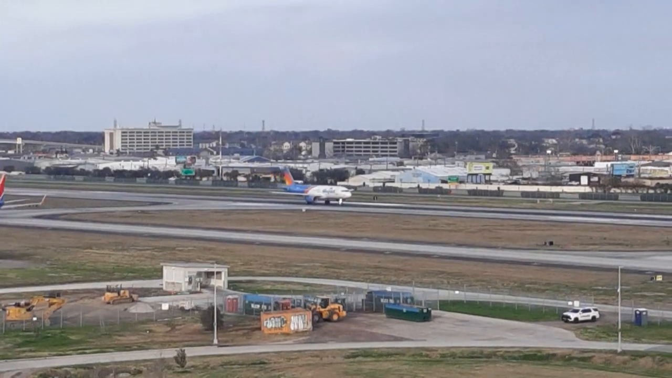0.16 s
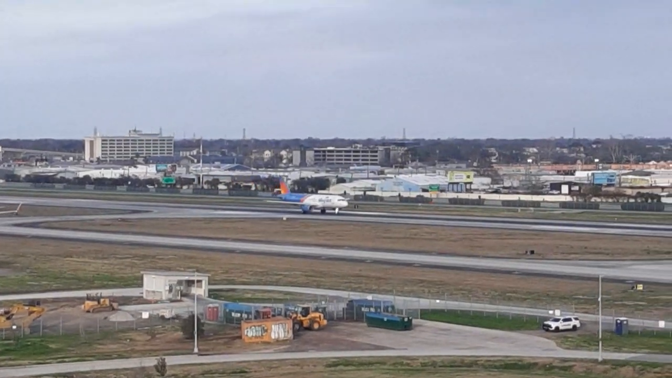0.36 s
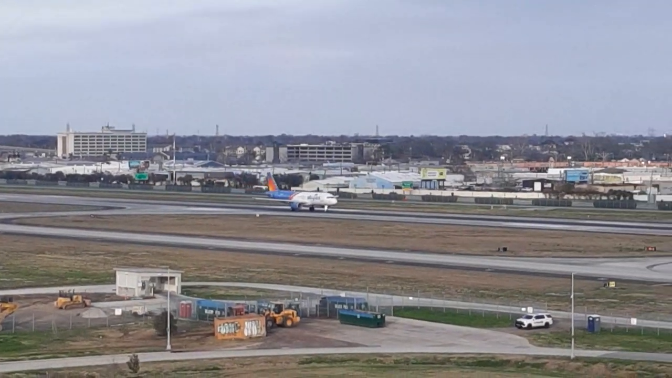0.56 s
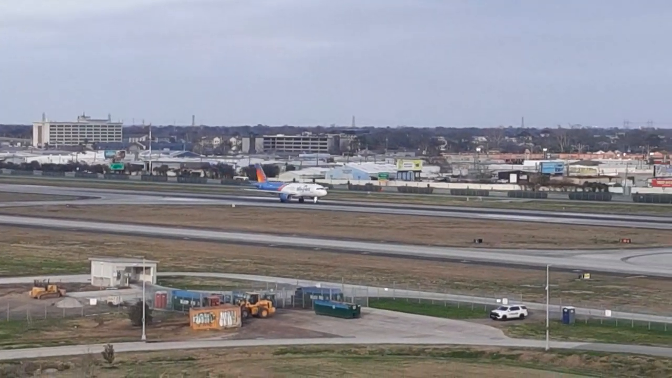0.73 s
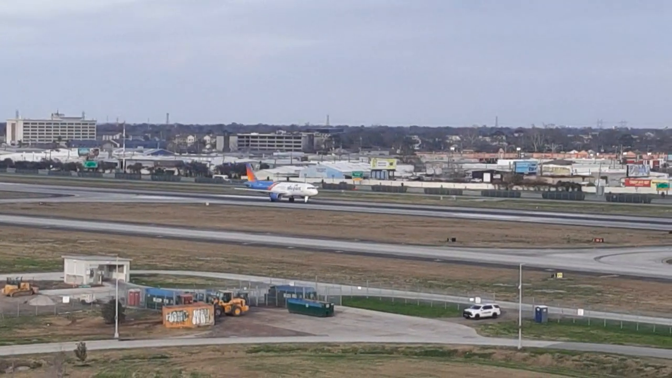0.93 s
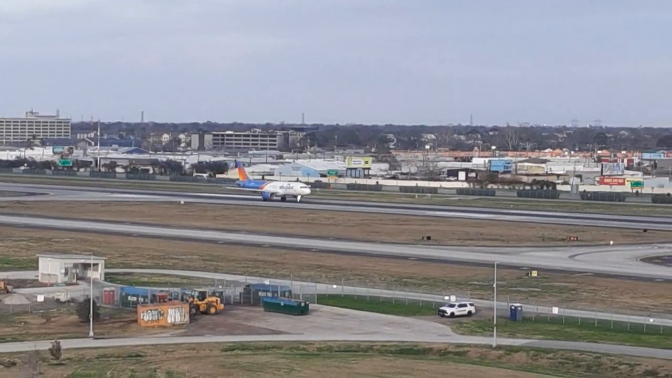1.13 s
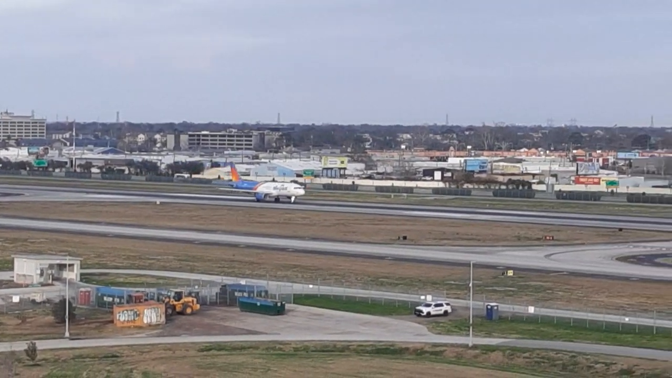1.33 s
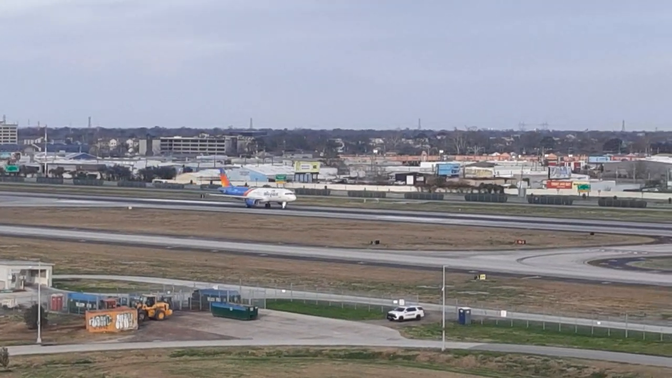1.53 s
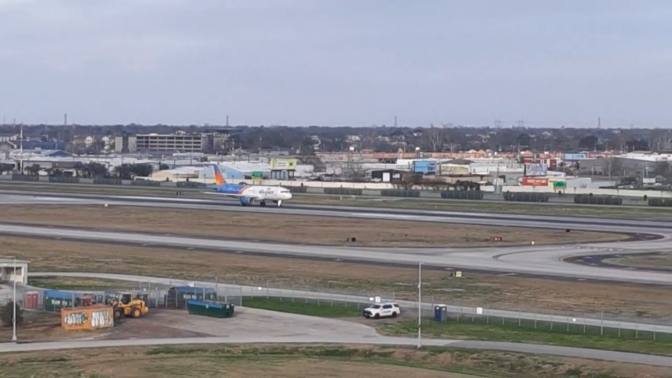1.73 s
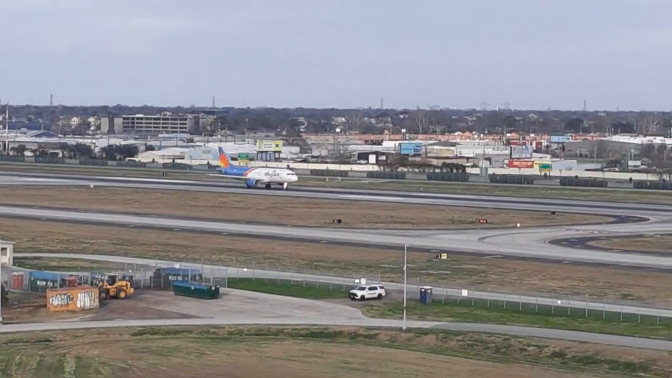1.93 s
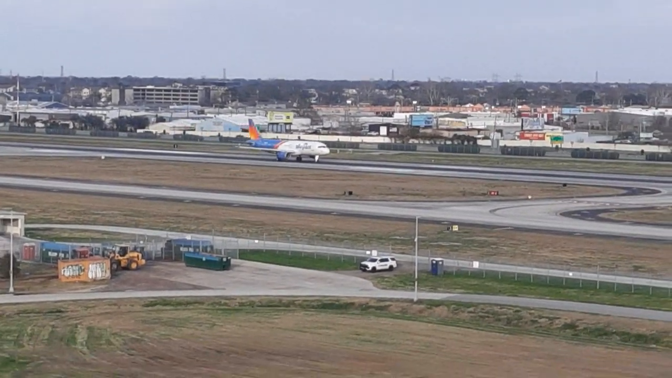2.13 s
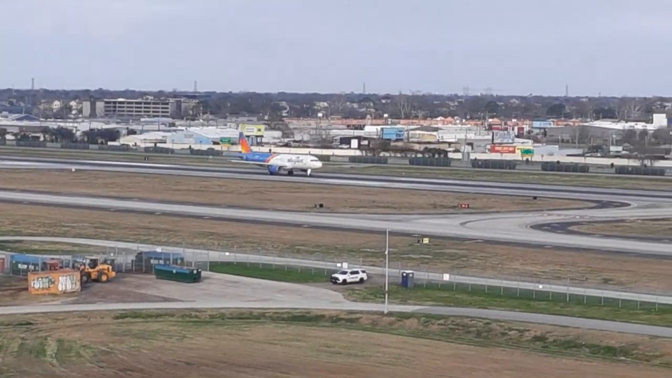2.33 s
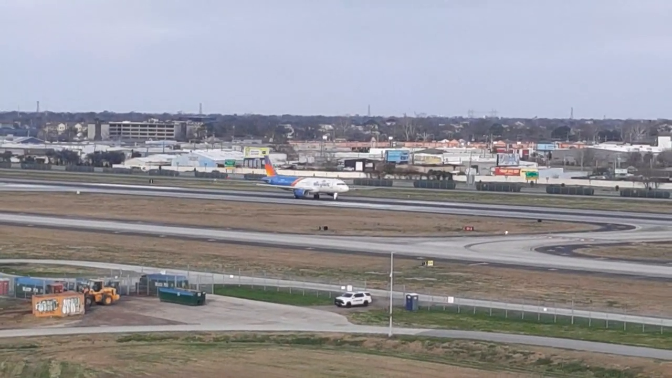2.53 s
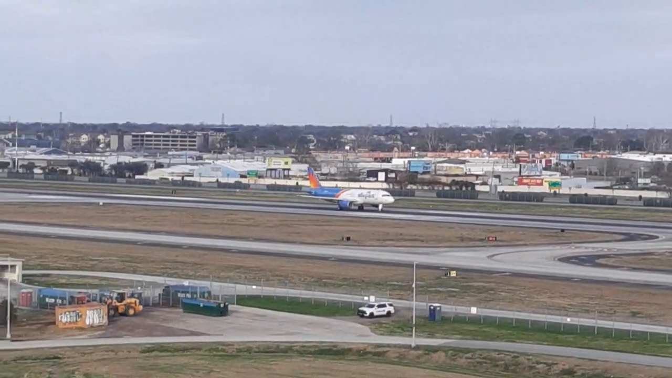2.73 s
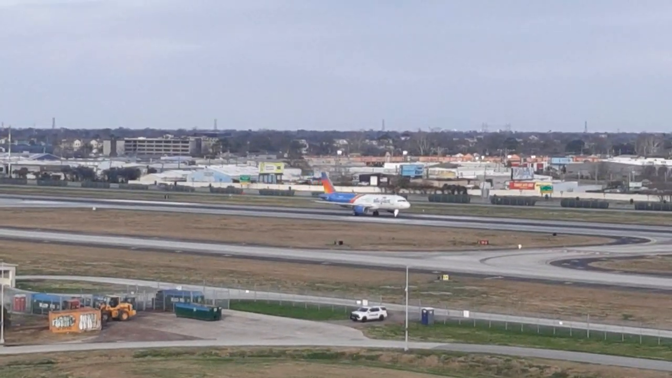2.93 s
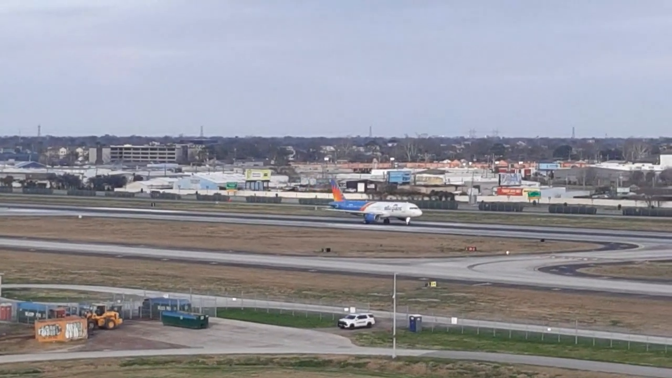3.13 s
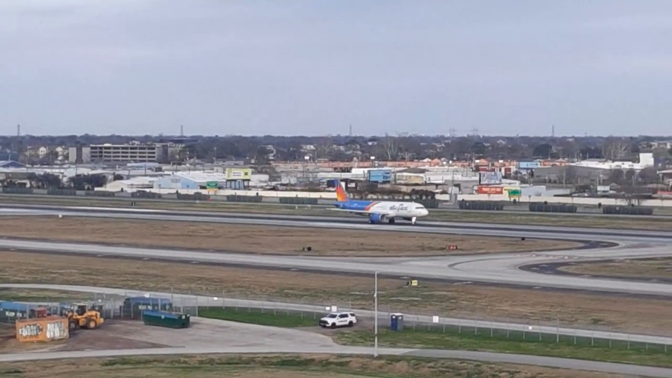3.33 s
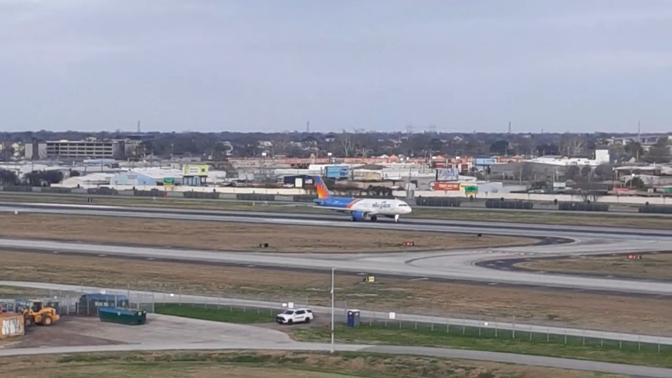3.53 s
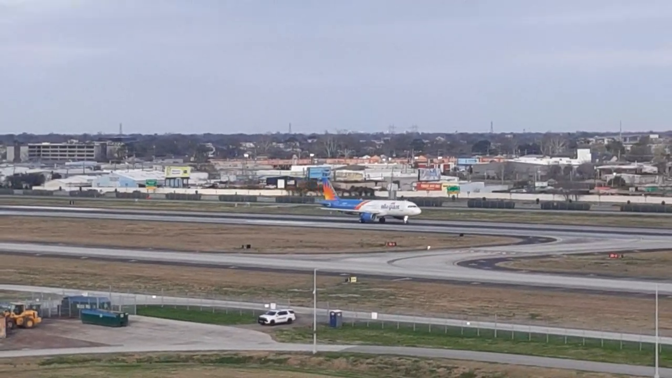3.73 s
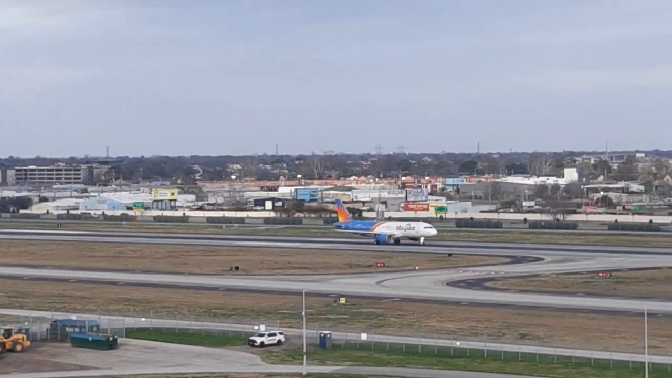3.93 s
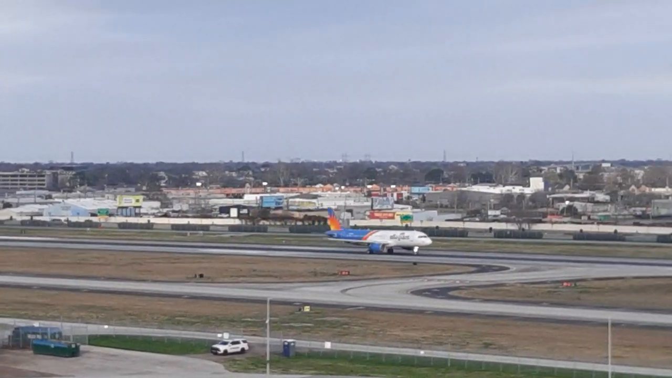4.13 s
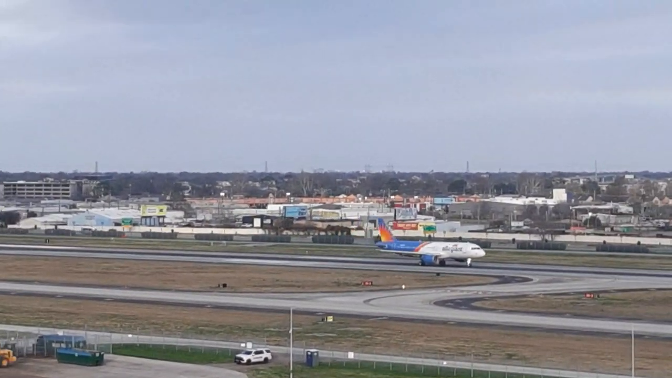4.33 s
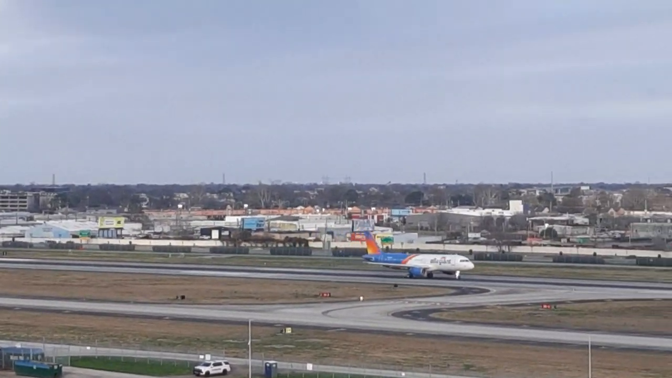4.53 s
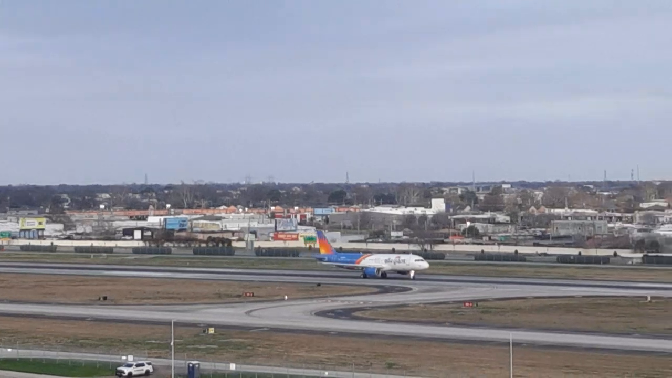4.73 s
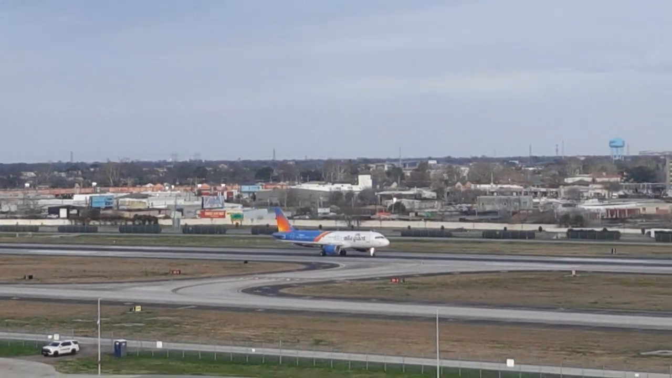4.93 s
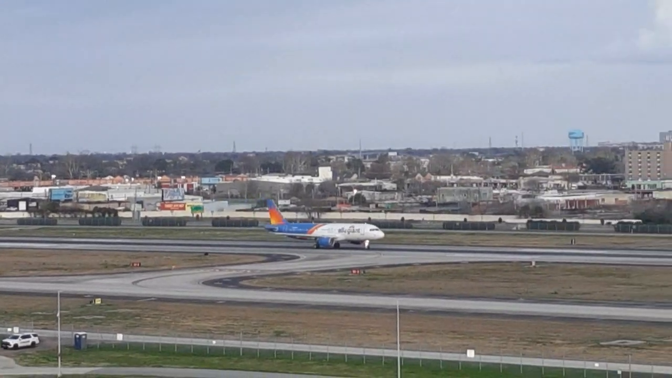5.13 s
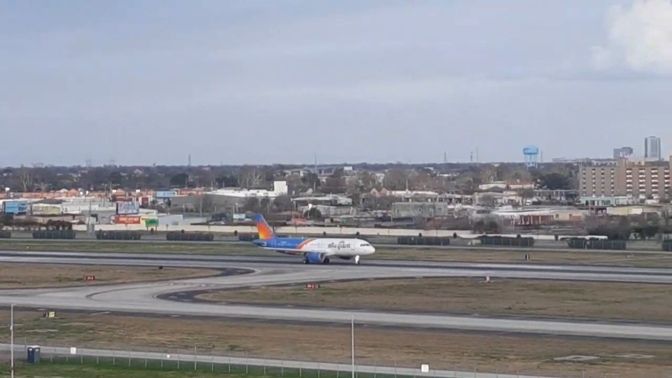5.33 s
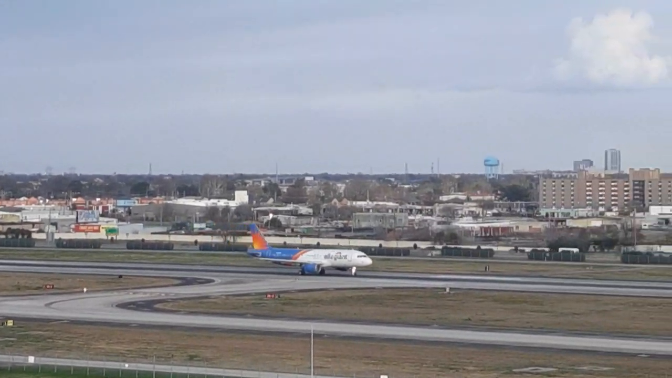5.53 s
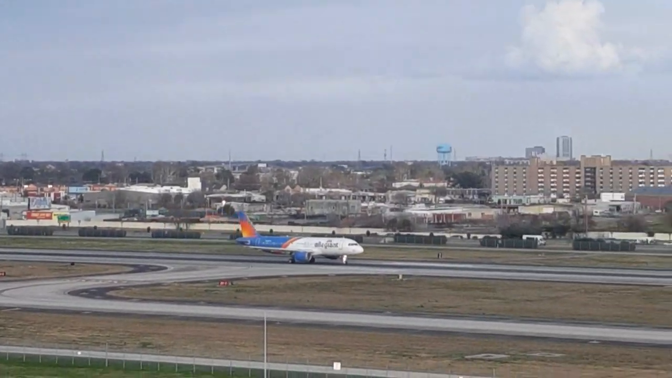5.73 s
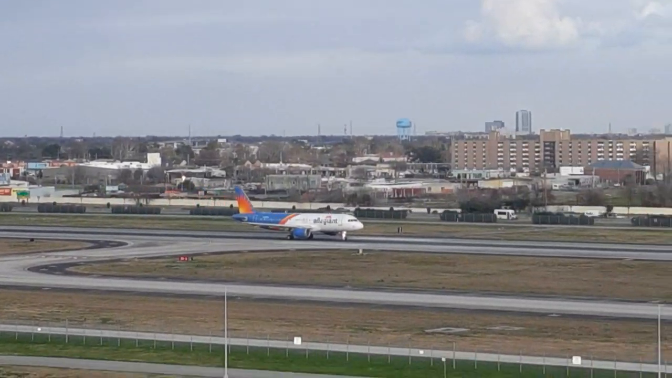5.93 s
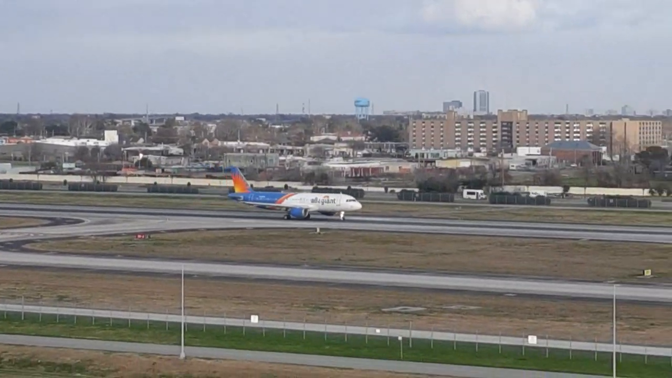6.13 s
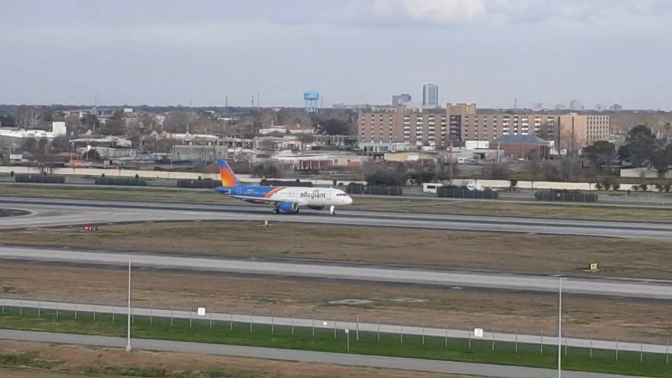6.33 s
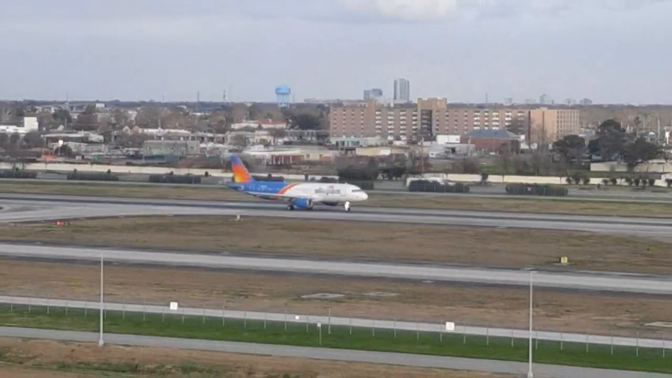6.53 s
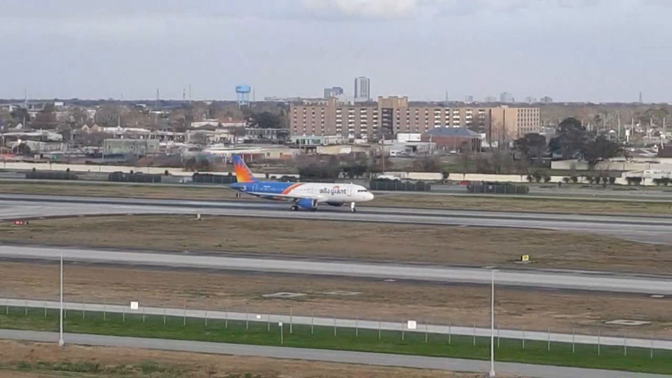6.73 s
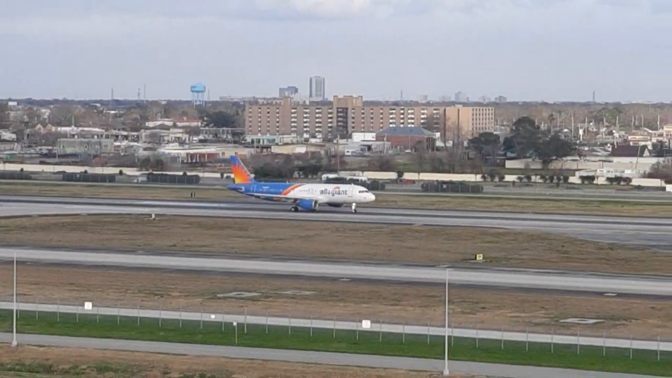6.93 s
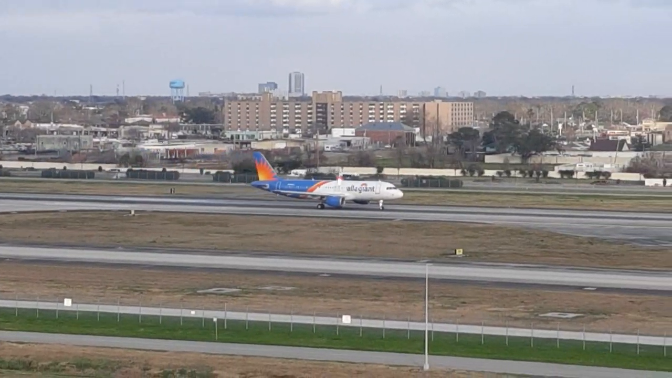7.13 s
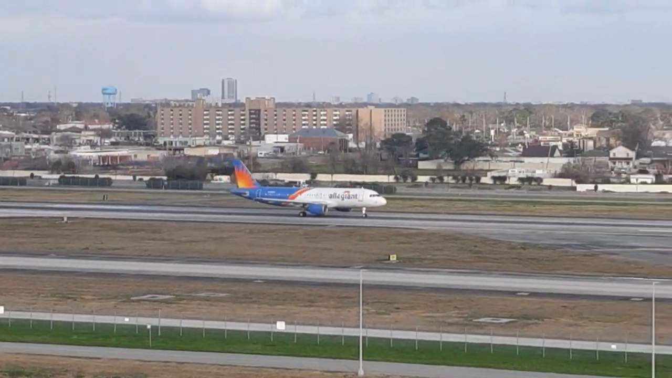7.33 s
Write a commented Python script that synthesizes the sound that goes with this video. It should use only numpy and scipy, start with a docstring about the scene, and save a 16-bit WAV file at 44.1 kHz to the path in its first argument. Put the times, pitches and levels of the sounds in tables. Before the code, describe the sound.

Distant jet takeoff growing louder across an open airfield: raspy buzz-saw fan drone, wavering hiss, low roar, and dull wind buffets on the microphone.

```python
"""A twin-jet airliner on its takeoff roll: supersonic fan tips give a buzz-saw stack of shaft harmonics.
A blade-passing whine and broadband fan hiss join it; shaped noise makes the exhaust roar, with a low drone.
Moving air makes the tones flutter, swell and fade, by random modulation and by timed level changes.
Behind lie two faint machinery hums; bursts of low noise are the wind buffeting the two microphone ports."""
import sys
import numpy as np
from scipy import signal
from scipy.fft import rfft, irfft
from scipy.io import wavfile
from scipy.ndimage import uniform_filter1d

SR = 44100
rng = np.random.default_rng(int(sys.argv[2]) if len(sys.argv) > 2 else 0)


def to_wav(sig):
    """Store sig (one row per channel, or 1-D mono) as 16-bit WAV at the path in sys.argv[1].

    Samples outside -1..1 are clipped; the rate is SR.
    """
    pcm = np.clip(np.atleast_2d(sig), -1, 1) * 32767
    pcm = np.round(pcm).astype(np.int16)
    wavfile.write(sys.argv[1], SR, pcm.T)  # frames by channels


N = 325458
TIME = np.arange(N) / SR

# Fan shaft speed as heard, Doppler shift included: time_s, shaft_turns_per_s
SHAFT_SPEED = [(0, 81.55), (0.7, 81.85), (0.95, 82.05), (1.4, 82.1), (2.3, 82.5), (2.9, 82.88),
               (3.35, 83.03), (3.8, 82.92), (4.4, 83.08), (4.85, 83.22), (5.1, 83.0), (5.7, 83.0),
               (6.3, 82.88), (6.8, 82.68), (7.38, 82.5)]
# Buzz-saw tones, uneven because no two blades are alike, relative to the fan level:
# shaft_multiple, ahead_db, side_db
BUZZ_TONES = [(4, -16.0, -9.0), (6, -20.0, -13.0), (8, -20, -18), (9, -11, -14.5), (10, -11, -10),
              (11, -16.0, -15.0), (12, -18.0, -16.5), (13, -13.0, -17.5), (14, -15.5, -18),
              (15, -13.0, -11.0), (16, -14.5, -12), (17, -14.5, -14.5), (18, -14.5, -13.5),
              (19, -18.0, -12.5), (20, -13.0, -9.5), (21, -12.0, -8.0), (22, -12.5, -12.0),
              (23, -15.5, -10.5), (24, -14.5, -13.5), (25, -13.5, -12.5), (26, -10.0, -10.0),
              (27, -12.5, -10.0), (28, -12.5, -12.5), (29, -19.5, -18.5), (30, -11.5, -11.5),
              (31, -15.5, -14.5), (32, -14.5, -14.5), (33, -5.5, -7), (34, -10.5, -15.5),
              (35, -15.5, -13.5), (37, -25.5, -14), (38, -18.0, -10.5), (39, -13.0, -8.0),
              (41, -17.5, -11.5), (42, -13.0, -12.0), (43, -10.0, -9.5), (45, -16.5, -16.0),
              (46, -17.5, -9.0), (48, -14.5, -10.0), (49, -19.0, -13.5), (50, -14.5, -11.0),
              (52, -24.5, -18.5), (53, -16.5, -13.0), (54, -21.5, -18.5), (55, -24.0, -18.5),
              (57, -15.5, -12.5), (59, -15.5, -14.0), (60, -14.5, -12.5), (61, -26.0, -17.5),
              (63, -25.0, -17.0), (65, -24.5, -15.0), (66, -21.5, -17.5), (67, -26.0, -14.0),
              (68, -24.5, -17.0), (69, -18.5, -14.5), (70, -27.0, -18.5), (72, -18.0, -16.5)]
# Relative spectrum of the broadband fan noise: frequency_hz, density_db_per_hz
HISS_SPECTRUM = [(400, -15), (620, 1), (780, 6), (1000, 5), (1300, -1.5), (1650, 3), (2200, 0.5),
                 (2650, 0.5), (2950, 2), (3350, -1.5), (4100, 1.5), (5300, -1), (6050, -3.5), (6350, -14),
                 (6800, -21.5), (7200, -36.5)]
# Fan levels abeam, before swells: low_db, middle_db, presence_db, top_db, whine_db
FAN_ABEAM_DB = [-24, -22.5, -23, -26.5, -28]
# How much more each fan level radiates to the side than ahead, same order: gain_db
FAN_SIDEWAYS_DB = [13.2, 16.9, 17.8, 16.45, 12.6]
# Centres of the low, middle, presence and top levels: frequency_hz
FAN_BAND_HZ = [950, 1740, 3120, 5150]
# Moving air swells or fades the fan sound:
# centre_s, length_s, low_db, middle_db, presence_db, top_db, whine_db
AIR_SWELLS = [(0.088, 0.39, 1, 5, 2.5, 2.5, -2.5), (0.8, 0.65, 0, 0.5, 1, -0.5, 0.5),
              (3.567, 0.16, -2, -1, 1, 0, -1), (1.217, 0.16, 3.5, 1.5, 3.5, 1, -4.5),
              (2.1, 0.61, -1.5, 0.5, 3, 1, 0), (2.806, 0.3, -4, -3.5, -0.5, -1.5, -4),
              (3.125, 0.17, -2, 3.5, 4.5, 0.5, 7), (3.341, 0.12, -2, 3.5, 7, 4.5, 2.5),
              (3.745, 0.091, -0.5, 0, 4, 1.5, 5), (3.92, 0.18, 3, 3, 5, 4.5, 2),
              (4.319, 0.68, -1, -0.5, 4.5, 2.5, 4), (4.675, 0.037, 0, 0, 2, 1.5, 7.5),
              (4.719, 0.15, 4.5, 7.5, 9, 5, 11), (4.878, 0.088, 4, 5.5, 9.5, 3.5, 12),
              (4.994, 0.11, 3.5, 0, 5, -2.5, 6), (5.45, 0.36, -9, -9, -3.5, -5.5, -4),
              (5.981, 0.19, 2.5, 3.5, 2, -2, 2), (6.148, 0.14, -0.5, 0, 6, 4, 5.5),
              (6.289, 0.1, 4, 6, 6, 0.5, 7.5), (6.458, 0.12, 2.5, -0.5, 9, 5.5, 3),
              (6.617, 0.084, -0.5, 2, 5, 1.5, 5.5), (6.775, 0.21, 1.5, 3.5, 2.5, -0.5, -7.5),
              (7.003, 0.044, 5, 2.5, 6.5, 0.5, 12), (7.081, 0.077, 1, 7, 10.5, 5.5, 0),
              (7.195, 0.083, 2.5, 4.5, 2, 3, 5), (7.366, 0.057, 2, 2, 1.5, 0.5, 1)]
# Air paths briefly add or cancel in one range of the fan sound:
# centre_s, length_s, centre_hz, width_hz, gain_db
AIR_FOCUS = [(0.3, 1.1, 2750, 80.4, -4), (.28, 0.3, 870, 70, 8.5), (2.5, 1.3, 3520, 80, 3),
             (3.332, 0.11, 2770, 160, 9), (3.4, 0.082, 2740, 60, 10.5), (4, 0.79, 800, 40, 6),
             (3.908, 0.75, 1180, 120, 7.5), (4.0, 0.18, 2750, 110, 8.5), (4.853, 0.23, 1435, 450, 7.5),
             (4.808, 0.32, 3900, 310, 5.5), (5.06, 0.045, 3400, 80, 13), (6.1, 0.47, 2680, 90, -2),
             (6.17, 0.11, 3400, 280, 9), (6.76, 0.18, 1735, 59, 10), (6.746, 0.16, 2150, 200, 2.5),
             (6.946, .45, 830, 35, 5), (6, 0.25, 2800, 131, -8), (7.075, 0.086, 2745, 70, 4.5),
             (7.15, 0.18, 2300, 400, 4), (7.087, 0.034, 4000, 400, 6.5), (7.15, 0.44, 670, 90, 11)]
# Exhaust roar: time_s, body_db, rasp_db
ROAR_LEVELS = [(0.1, -34, -29), (0.65, -35.5, -34), (1.25, -31.5, -29.5), (1.8, -30.5, -33),
               (2.7, -29.5, -34), (3.3, -29, -36), (3.9, -26.5, -33.5), (4.85, -24, -30),
               (5.55, -30, -32.5), (5.95, -27.5, -23), (6.28, -22, -22), (7.05, -28, -23.5),
               (7.38, -25.5, -25)]
# Rumble under the roar: time_s, level_db
RUMBLE_LEVEL = [(0, -33), (6.25, -35), (6.7, -38.5)]
# Relative spectrum of the roar: frequency_hz, density_db_per_hz
ROAR_SPECTRUM = [(20, -38), (40, -24), (60, -3), (85, 7.5), (140, 6), (200, 3), (270, 0.5), (340, -0.5),
                 (450, -4), (600, -10), (800, -10.5), (1300, -54)]
# Low drone on the third shaft multiple: time_s, level_db
DRONE_LEVEL = [(0.1, -41.5), (0.6, -56), (1.2, -42), (2, -48.5), (2.75, -32.5), (3.2, -46.5), (3.6, -35),
               (4.2, -37.5), (4.8, -29), (5.5, -39.5), (6.15, -31.5), (7.38, -41)]
# Faint hum of airfield machinery: centre_s, length_s, pitch_hz, peak_db
MACHINE_HUM = [(0.68, 3.1, 631, -46), (2.807, 2.8, 561.5, -48)]
# Strong wind buffets on the ports: centre_s, length_s, left_db, right_db, centre_hz
WIND_GUSTS = [(0.864, 0.042, -40, -26, 108.5), (0.927, 0.033, -34, -19.5, 156.6),
              (1.089, 0.016, -39, -25.5, 122.6), (1.478, 0.044, -50, -26, 110.7),
              (4.8, 0.35, -36, -30, 134), (5.079, 0.094, -32, -23, 167.6), (5.169, 0.027, -28, -19, 136),
              (5.35, 0.042, -46, -21.5, 123.5), (5.408, 0.024, -48, -18, 201), (5.79, 0.034, -24, -32, 260),
              (5.95, 0.04, -16.5, -18, 260.7), (5.975, 0.034, -25, -29, 299),
              (6.013, 0.023, -20.5, -17.5, 284), (6.099, 0.024, -17.5, -21, 279),
              (6.157, 0.016, -18.5, -18, 292), (6.238, 0.03, -22, -21.5, 280),
              (6.325, 0.036, -27, -26, 320), (6.408, 0.014, -36, -26, 360), (6.55, 0.018, -26, -28, 310),
              (6.619, 0.018, -25, -25, 330)]
# Relative spectrum of a buffet: multiple_of_centre, density_db_per_hz
GUST_SPECTRUM = [(.1, -26), (.3, -14.5), (.55, -6), (1, -6.5), (1.35, -7), (2.2, -15.5), (4, -29.5),
                 (10, -42), (25, -83.5)]
# Likeness of fan hiss and roar at the two ports: frequency_hz, left_right_correlation
PORT_LIKENESS = [(30, 0.6), (100, 0.98), (300, 0.98), (600, 0.71), (1200, 0.7), (3000, 0.93), (6500, 0.55)]
# Level difference between the ports: frequency_hz, left_minus_right_db
PORT_DIFFERENCE = [(100, 0), (800, 0), (1500, -0.5), (2200, -1.5), (3200, -1.24), (4600, -2), (6500, 1.3)]
# The deep bass thins out once the wind is up: time_s, edge_hz
BASS_EDGE = [(0, 24.2), (5.35, 22.6), (5.6, 58), (6, 95.2), (6.3, 162), (7.38, 157)]

# The aircraft closes in along the runway and would be abeam at ABEAM_S
SPEED_M_PER_S, ABEAM_M, ABEAM_S = 62.57, 305.7, 10.16
TOP_LOSS_DB_PER_KM = 22.5  # air absorption of the top beyond the abeam distance
# When the side of the fans takes over from their front, and how gradually
SIDE_ON_S, SIDE_ON_SPREAD_S = 5.6, 0.43
BLADES = 36
WHINE_TURN_S, WHINE_FADE_DB_PER_S = 6.7, 10
WHINE_STEADY, WHINE_SIDE_STEADY = 0.78, 0.25  # direct share of the power
WANDER_TURNS, WANDER_HZ = 0.005, 6  # shaft turns (complex rms), rate
SMEAR_DB, SMEAR_SIDE_DB, SMEAR_WIDTH_HZ = -5.5, -18.5, 260  # relative to the whine
TONE_FADE_DB, TONE_FADE_HZ = 1.3, 1.2  # complex rms, rate
TWINKLE_DB, TWINKLE_HZ = 0.5, 22  # complex rms, rate
HISS_AHEAD_DB, HISS_SIDE_DB = 4.5, 0.5  # side-on, the tones stand further out of the hiss
HISS_FOCUS_SHARE = 0.5  # share of the focusing dB that the hiss receives
DRONE_STEADY, DRONE_WIDTH_HZ = 0.62, 8
# Weak buffets at random moments; the spread lowers each port's level by a random part of it
PUFFS_PER_S, PUFF_S, PUFF_DB, PUFF_SPREAD_DB, PUFF_HZ = 1.5, 0.05, -32.5, 6.5, 160
KNOCK_WEIGHT, KNOCK_CYCLES = 0.45, 8  # weight in power; cycles from its peak to e^-2
PORT_LAG = 2.53  # samples by which the left port trails the right
EDGE_HZ, TOP_HZ = 7150, 15700  # microphone and recorder band limits
MIC_HISS_DB, EDGE_FADE_S = -71.5, 0.004


def fans(turns):
    """Propagation through moving air: buzz, blade whine and hiss share one fast random level modulation."""
    *levels_db, whine_db = fan_levels()
    side_on = (1 + np.tanh((TIME - SIDE_ON_S) / (2 * SIDE_ON_SPREAD_S))) / 2
    buzz = buzz_saw(turns, levels_db, side_on)
    whine = blade_whine(turns, whine_db, side_on)
    hiss = fan_hiss(levels_db, side_on)
    twinkle_db = TWINKLE_DB * flutter(TWINKLE_HZ).real
    return amp(twinkle_db) * (buzz + whine + hiss)


def buzz_saw(turns, levels_db, side_on, gain_db=-1.0, clear_hz=2100, blur=0.0035):
    """Shock waves locked to the rotor give shaft harmonics; scattering grows with pitch, focusing purifies."""
    tones_hz = np.transpose(BUZZ_TONES)[0] * np.mean(np.transpose(SHAFT_SPEED)[1])
    coarse = TIME[::256]
    out = np.zeros((2, N))
    for (multiple, ahead_db, side_db), hz, focused_db in zip(BUZZ_TONES, tones_hz, focus_db(tones_hz, coarse)):
        focused_db = np.interp(TIME, coarse, focused_db)
        air_db = focused_db + TONE_FADE_DB * flutter(TONE_FADE_HZ).real
        tone_db = ahead_db + (side_db - ahead_db) * side_on
        level_db = blend(levels_db, FAN_BAND_HZ, hz)[0] + tone_db + air_db + gain_db
        scattered = (1 - np.exp(-hz / clear_hz)) / amp(np.maximum(focused_db, 0)) ** 2
        out += amp(level_db) * tone(turns, multiple, 1 - scattered, 2 + blur * hz, spread=0.28)
    return out


def blade_whine(turns, whine_db, side_on):
    """Blade passing sounds at blades times shaft speed; phase wander and scattering broaden the line."""
    steady = WHINE_STEADY + (WHINE_SIDE_STEADY - WHINE_STEADY) * side_on
    wander = WANDER_TURNS * flutter(WANDER_HZ).real
    line = tone(turns + wander, BLADES, steady, width_hz=17, spread=0.22)
    smear_db = SMEAR_DB + (SMEAR_SIDE_DB - SMEAR_DB) * side_on
    smear = amp(smear_db) * tone(turns, BLADES - 1.5, 0, SMEAR_WIDTH_HZ, spread=0.2)
    return amp(whine_db) * (line + smear)


def fan_hiss(levels_db, side_on):
    """Broadband fan noise: random pressure shaped in frequency, following the fan levels."""
    gain_db = HISS_AHEAD_DB + (HISS_SIDE_DB - HISS_AHEAD_DB) * side_on
    noise = air_noise(HISS_SPECTRUM, levels_db, FAN_BAND_HZ, patchy_db=1.77, flicker_db=0.5,
                      focus_share=HISS_FOCUS_SHARE)
    return amp(gain_db) * noise


def fan_levels():
    """Spherical spreading, directivity and air absorption set the approach levels; timed swells add to them."""
    distance_m = np.hypot(ABEAM_M, SPEED_M_PER_S * (ABEAM_S - TIME))
    nearness = ABEAM_M / distance_m
    approach_db = 20 * np.log10(nearness) + np.outer(FAN_SIDEWAYS_DB, nearness ** 2 - 1)
    extra_km = (distance_m - ABEAM_M) / 1000
    turned_db = WHINE_FADE_DB_PER_S * np.maximum(TIME - WHINE_TURN_S, 0)
    swells_db = sum(np.outer(dbs, bump(s, length)) for s, length, *dbs in AIR_SWELLS)
    total_db = np.array(FAN_ABEAM_DB)[:, None] + approach_db + swells_db
    low_db, middle_db, presence_db, top_db, whine_db = total_db
    return low_db, middle_db, presence_db, top_db - TOP_LOSS_DB_PER_KM * extra_km, whine_db - turned_db


def focus_db(hz, t=TIME):
    """Interference of air paths: dB added or cancelled, frequencies x times."""
    _, _, centre_hz, width_hz, _ = np.transpose(AIR_FOCUS)
    over_frequency = np.exp(-((hz[:, None] - centre_hz) / width_hz) ** 2)
    over_time = np.array([db * bump(s, length, t) for s, length, _, _, db in AIR_FOCUS])
    return over_frequency @ over_time


def exhaust(turns):
    """Turbulent jet mixing radiates broadband roar; the low shaft drone stands in it as a tone."""
    body_db, rasp_db = curves(ROAR_LEVELS)
    levels_db = [curves(RUMBLE_LEVEL)[0], body_db, rasp_db]
    roar = air_noise(ROAR_SPECTRUM, levels_db, [95, 220, 400], patchy_db=0.1, flicker_db=1.0)
    drone = tone(turns, 3, DRONE_STEADY, DRONE_WIDTH_HZ, spread=0.1)
    return roar + amp(curves(DRONE_LEVEL)[0]) * drone


def tone(turns, multiple, steady, width_hz, spread):
    """Scattering by eddies: a direct line plus a wavering part, slightly unlike at the two ports."""
    steady = np.clip(steady, 0, 1)
    direct = np.sqrt(steady) * np.exp(2j * np.pi * rng.random())
    scattered = np.sqrt(1 - steady) * flutter(width_hz)
    carrier = np.sqrt(2) * np.exp(2j * np.pi * multiple * turns)
    mid = ((direct + scattered) * carrier).real
    side = spread * (flutter(width_hz) * carrier).real
    return np.array([mid + side, mid - side])


def flutter(width_hz):
    """Random modulation broadens a spectral line: complex wavering of rms 1 and the given width."""
    rate = 500  # grid points a second
    f = np.fft.fftfreq(4096, 1 / rate)
    a, b = rng.standard_normal((2, len(f)))
    line_shape = (1 + (f / width_hz) ** 2) ** 0.75
    z = unit(np.fft.ifft((a + 1j * b) / line_shape))
    return np.interp(TIME, np.arange(len(f)) / rate, z)


def air_noise(colour, levels_db, centres_hz, patchy_db, flicker_db, focus_share=0):
    """Partly coherent noise at two ports: level curves, drifting patches and a flicker common to all pitches."""
    hz, t, z = signal.stft(rng.standard_normal((2, N)), SR, nperseg=2048, noverlap=1792)
    same = np.clip(read(PORT_LIKENESS, hz), 0, 1)[:, None]
    mid = z[0] * np.sqrt((1 + same) / 2)
    side = z[1] * np.sqrt((1 - same) / 2)
    patches = uniform_filter1d(rng.standard_normal(mid.shape), size=30, axis=0)
    patches = unit(uniform_filter1d(patches, size=14, axis=1))
    flicker = unit(uniform_filter1d(rng.standard_normal(len(t)), size=8))
    field_db = blend([np.interp(t, TIME, db) for db in levels_db], centres_hz, hz)
    field_db = field_db + patchy_db * patches + flicker_db * flicker + focus_share * focus_db(hz, t)
    gain = unit(amp(read(colour, hz)))[:, None] * amp(field_db)
    return signal.istft(np.array([mid + side, mid - side]) * gain, SR, nperseg=2048, noverlap=1792)[1][:, :N]


def airfield():
    """Rotating machinery hums at fixed pitch; scattering makes two far lines waver as they drift in and out."""
    return sum(amp(db) * bump(s, length) * tone(TIME, hz, steady=0.12, width_hz=9.9, spread=0.3)
               for s, length, hz, db in MACHINE_HUM)


def wind():
    """Turbulent pressure on the ports: timed strong gusts, and weak puffs at random moments."""
    strong = sum(gust(*row) for row in WIND_GUSTS)
    chances = rng.random((round(PUFFS_PER_S * N / SR), 3))
    weak = sum(gust(when * N / SR, PUFF_S, PUFF_DB - PUFF_SPREAD_DB * left,
                    PUFF_DB - PUFF_SPREAD_DB * right, PUFF_HZ)
               for when, left, right in chances)
    return strong + weak


def gust(s, length, left_db, right_db, centre_hz):
    """Low eddies are incoherent between the ports; a brief dull knock is common to both."""
    out = np.zeros((2, N))
    size = 2 ** 15
    hz = np.fft.rfftfreq(size, 1 / SR)
    first = np.clip(round(s * SR) - size // 2, 0, N - size)
    span = slice(first, first + size)
    t = TIME[span]
    shape = bump(s, length, t)
    eddies = unit(irfft(rfft(rng.standard_normal((2, size))) * amp(read(GUST_SPECTRUM, hz / centre_hz))))
    cycle = np.cos(2 * np.pi * (centre_hz * t + rng.random()))
    knock = np.sqrt(2) * bump(s, KNOCK_CYCLES / centre_hz, t) * cycle
    burst = shape * (np.sqrt(1 - KNOCK_WEIGHT) * eddies + np.sqrt(KNOCK_WEIGHT) * knock)
    # each port's burst gets the energy of the envelope at the given level
    to_energy = np.linalg.norm(shape) / np.linalg.norm(burst, axis=1, keepdims=True)
    out[:, span] = amp([[left_db], [right_db]]) * burst * to_energy
    return out


def ports(x):
    """Interaural-type cues: a lag and level difference between ports, and a treble lift common to both."""
    hz = np.fft.rfftfreq(N, 1 / SR)
    left = np.exp(-2j * np.pi * hz * PORT_LAG / SR) * amp(read(PORT_DIFFERENCE, hz))
    treble = amp(read([(1000, 0.5), (3000, 2.0), (4500, 3.0), (6300, 5.5)], hz))  # (Hz, dB)
    return irfft(rfft(x) * np.array([left, np.ones(len(hz))]) * treble, N)


def thin_bass(x, depth_db=-11):
    """A time-varying shelf: a bass dip whose upper edge moves, sparing the deepest rumble."""
    hz, t, z = signal.stft(x, SR, nperseg=2048, noverlap=1536)
    below = 1 / (1 + (hz[:, None] / curves(BASS_EDGE, t)[0]) ** 6)
    share = read([(35, 0), (90, 0.92)], hz)[:, None]  # (Hz, share of the depth)
    return signal.istft(z * amp(depth_db * below * share), SR, nperseg=2048, noverlap=1536)[1][:, :N]


def low_pass(x, hz):
    """Linear-phase filtering: a steep band limit."""
    return signal.oaconvolve(x, signal.firwin(511, hz, window=("kaiser", 9), fs=SR)[None], "same")


def amp(db):
    """The level law: decibels to pressure gain."""
    return 10 ** (np.asarray(db) / 20)


def unit(x):
    """Power normalisation: scales to rms 1."""
    return x / np.sqrt(np.mean(abs(x) ** 2) + 1e-20)


def bump(s, length, t=TIME):
    """A Gaussian envelope around the moment s, down to e^-2 at one length either side."""
    return np.exp(-2 * ((t - s) / length) ** 2)


def curves(rows, t=TIME):
    """Linear interpolation of a table's columns at the times t."""
    s, *columns = np.transpose(rows)
    return [np.interp(t, s, c) for c in columns]


def read(points, hz):
    """Interpolation over log frequency, by straight lines."""
    f, value = np.transpose(points)
    return np.interp(np.log(hz + 1), np.log(f + 1), value)


def blend(levels_db, centres_hz, hz):
    """Interpolation of a few band levels over frequency: frequencies x times."""
    shares = [read(list(zip(centres_hz, pick)), np.atleast_1d(hz)) for pick in np.eye(len(levels_db))]
    return np.transpose(shares) @ np.array(levels_db)


def scene():
    """Superposition: aircraft and airfield from afar, then the wind at the ports."""
    turns = np.cumsum(curves(SHAFT_SPEED)[0]) / SR
    afar = fans(turns) + exhaust(turns) + airfield()
    return thin_bass(ports(afar) + wind())


def record(dry):
    """Band limitation: a narrow-band microphone, a trace of electronic hiss, and the recorder's limit."""
    soft_ends = np.minimum(np.minimum(TIME, TIME[::-1]) / EDGE_FADE_S, 1)
    microphone = low_pass(dry * soft_ends, EDGE_HZ)
    hiss = amp(MIC_HISS_DB) * rng.standard_normal((2, N))
    return low_pass(microphone + hiss, TOP_HZ)


dry = scene()
out = record(dry)
to_wav(out)
```